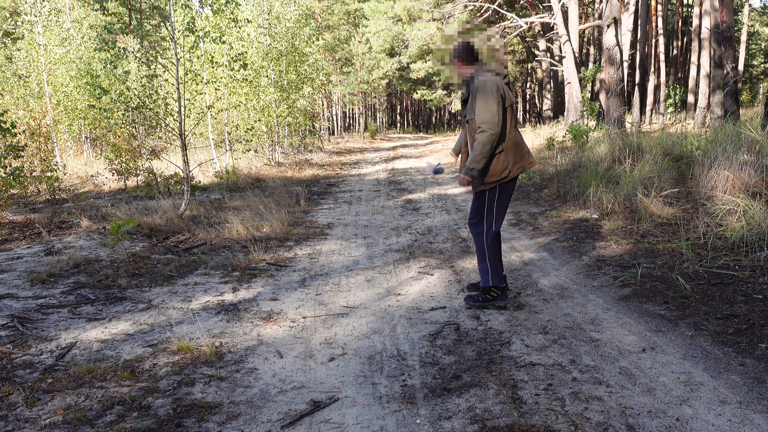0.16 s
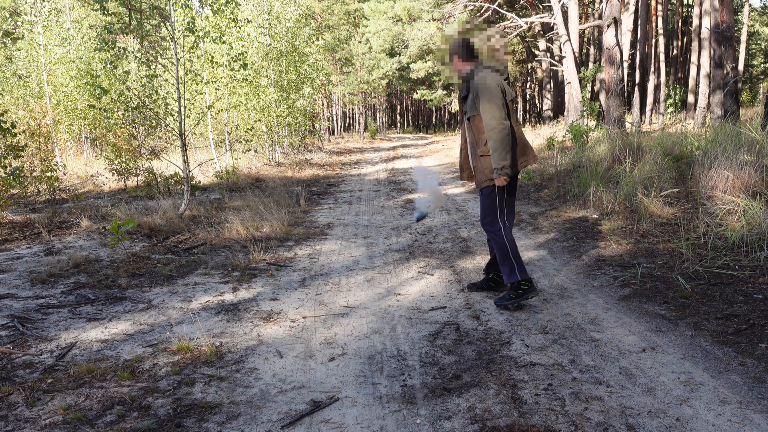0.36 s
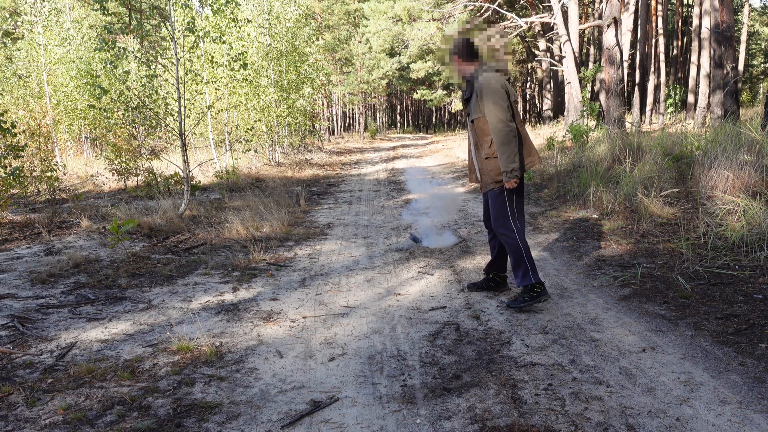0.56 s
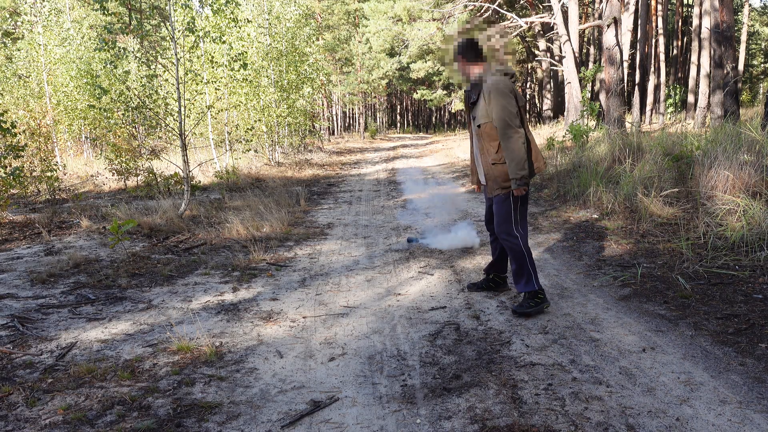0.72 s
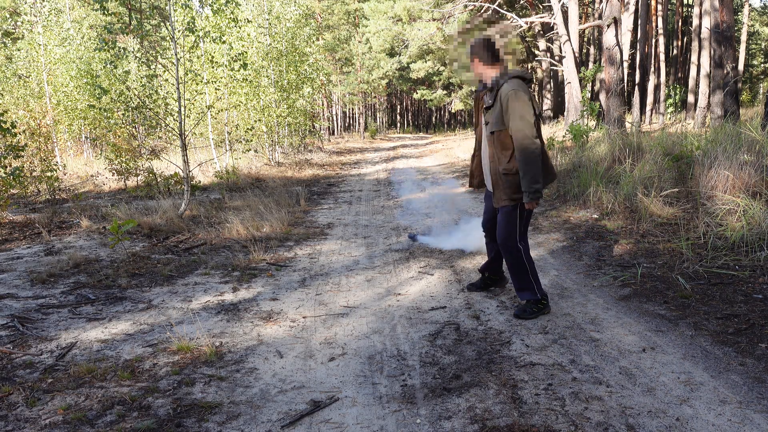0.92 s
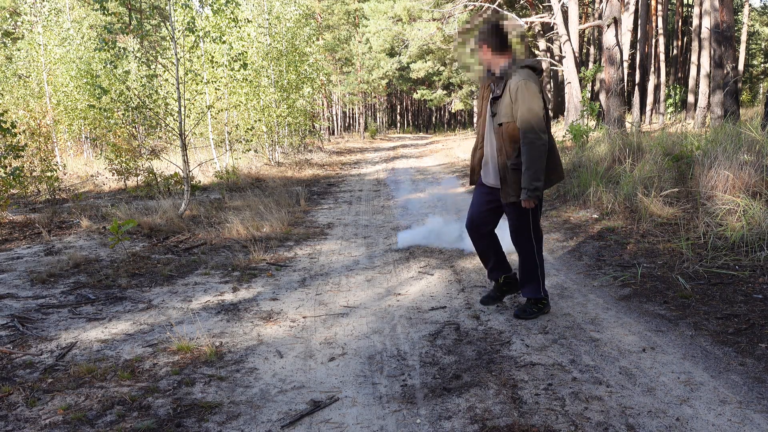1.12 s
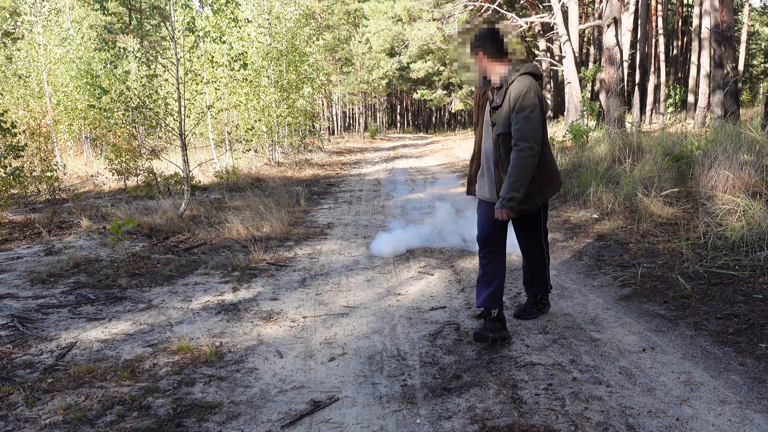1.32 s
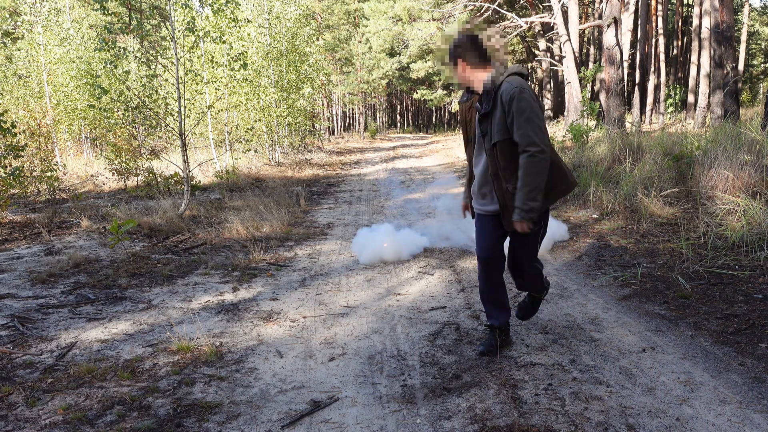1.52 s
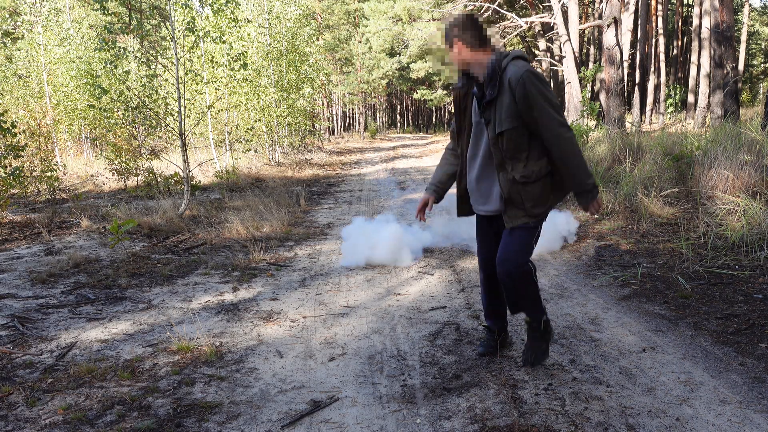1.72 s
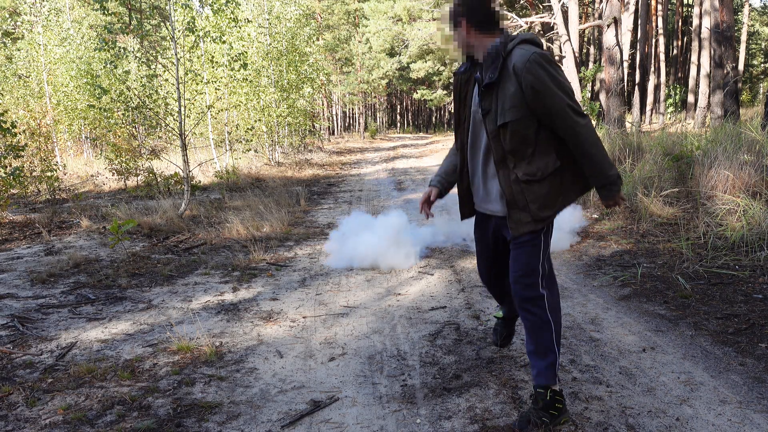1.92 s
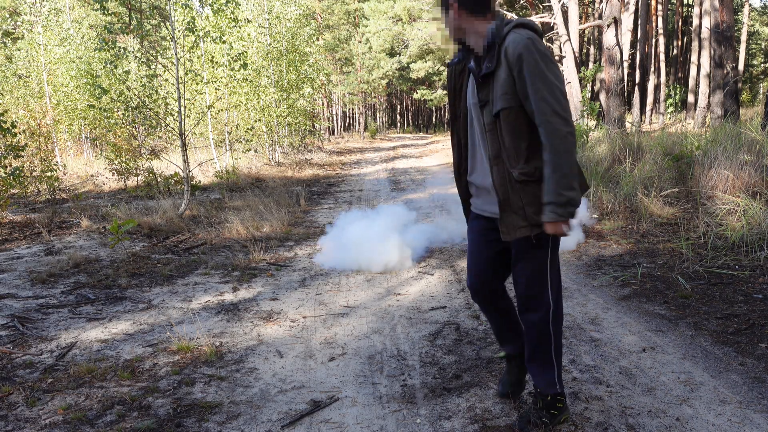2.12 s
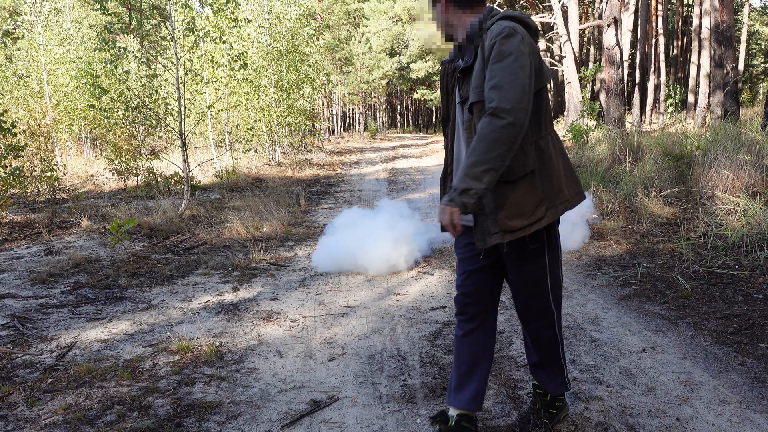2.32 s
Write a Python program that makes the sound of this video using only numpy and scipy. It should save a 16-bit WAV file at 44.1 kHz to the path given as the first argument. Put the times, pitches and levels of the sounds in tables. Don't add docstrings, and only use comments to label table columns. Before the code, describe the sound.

A smoke grenade ignites with a quick sharp pop, then a loud turbulent gas hiss bursts out, shifting between dull and bright as it rolls, with crackling and snapping spits, outdoors in quiet forest, in stereo.

```python
import sys
import numpy as np
from scipy import signal
from scipy.io import wavfile
from scipy.ndimage import map_coordinates

SR = 44100
rng = np.random.default_rng(int(sys.argv[2]) if len(sys.argv) > 2 else 0)


def to_linear_factor(level_db):
    exponent = np.asarray(level_db, float) / 20
    return 10 ** exponent


def output_pcm(signal):
    pcm = np.clip(np.atleast_2d(signal).T, -1, 1) * 32767
    wavfile.write(sys.argv[1], SR, np.round(pcm).astype(np.int16))


N = 104120


def in_time(rows):
    start_s, *columns = np.transpose(rows)
    return [np.interp(np.arange(N) / SR, start_s, column) for column in columns]


def rms_one(x):
    return x / np.sqrt(np.mean(x ** 2) + 1e-20)


def band(x, low_hz, high_hz):
    edges_hz = [low_hz, min(high_hz, .46 * SR)]
    return signal.sosfilt(signal.butter(2, edges_hz, "band", fs=SR, output="sos"), x)


def low_pass(x, cut_hz):
    return signal.sosfilt(signal.butter(1, cut_hz, fs=SR, output="sos"), x)


def drift(rate_hz):
    pole = np.exp(-40 * np.pi * rate_hz / SR)
    noise = rng.standard_normal(N // 20 + 4002)
    slow = signal.lfilter([1], [1, -2 * pole, pole * pole], noise)[4000:]
    return np.interp(np.arange(N) / 20, np.arange(len(slow)), rms_one(slow - slow.mean()))


def banded(spectrum, gain_db):
    white = rng.standard_normal((2, N))
    edges_hz = 35 * 2 ** np.arange(0, 9.1, .5)
    hz, db = np.transpose(spectrum)
    plain, out = 0, 0
    for k, (low_hz, high_hz) in enumerate(zip(edges_hz, edges_hz[1:])):
        colour_db = np.interp(np.log(low_hz * high_hz) / 2, np.log(hz), db)
        part = to_linear_factor(colour_db) * band(white[k % 2], low_hz, high_hz)
        plain = plain + part
        out = out + part * to_linear_factor(gain_db(np.sqrt(low_hz * high_hz)))
    return out / np.std(band(plain, 1000, 6000))


def bursts(rows):
    t, shape, clicks = np.arange(N) / SR, np.zeros(N), np.zeros(N)
    for start_s, peak_db, decay_s in rows:
        fade = np.exp(-np.clip(t - start_s, 0, 1) / max(decay_s, 2e-4))
        shape += to_linear_factor(peak_db) * (t >= start_s) * fade
        clicks[int(start_s * SR)] = to_linear_factor(peak_db)
    return shape, clicks


# freq_hz, density_db [dB per Hz]
FOREST_COLOUR = [(24, -60), (40, -52), (148, -5), (406, -9), (1620, -9.5), (14500, -19), (16500, -39)]


def forest_air():
    level_db = -55
    return to_linear_factor(level_db) * rms_one(banded(FOREST_COLOUR, lambda hz: 0))


# start_s, peak_db, decay_s
PRIMER_POPS = [
    (.0698, -17, .0012),
    (.0721, -9, .0008),
    (.0733, -10, .0009),
]
# centre_hz, width_hz, level_db
MOUTH_MODES = [(1240, 1130, 0), (3920, 2100, 1), (7700, 3100, -7.5), (13300, 3400, -11)]


def ignition():
    shape, clicks = bursts(PRIMER_POPS)
    kick = shape * rng.standard_normal(N) + 2 * clicks
    out = 0
    for k, (centre_hz, width_hz, level_db) in enumerate(MOUTH_MODES):
        ring = band(kick, centre_hz - width_hz / 2, centre_hz + width_hz / 2)
        out = out + (-1) ** k * to_linear_factor(level_db + 6.5) * ring
    return out


# start_s, pressure_db, aim_db [nozzle aim as treble gain], sputter [0-1], bass_db [fullness]
GAS_JET = [(.1, -18.5, -7.5, 0.5, 1.5), (.22, -13.5, -21, 0.03, 1.5), (.32, -24.5, -28.5, 0.17, 2),
           (.39, -28, -18, 0.3, 8), (.49, -25.5, -5.5, 0.25, 12), (.62, -30.5, -5, 0.45, 12),
           (.75, -28.5, 2.5, 0.6, 5), (.9, -31.5, -5, 0.62, 0.5), (1.01, -30.5, 3, .5, 2),
           (1.14, -25, -19.5, 0.74, -4), (1.22, -18, -20, 0.4, -19), (1.29, -19, -8.5, 0.73, 5),
           (1.45, -19, -17.5, 0.42, 6.5), (1.57, -25, -14.5, 0.83, -1), (1.78, -27, -4, 0.91, -5.5),
           (1.99, -26, 4, 0.52, -9), (2.19, -21, -3, 0.64, 3.5), (2.36, -20.5, -6.5, 0.38, 10.5)]
# freq_hz, density_db [dB per Hz]
JET_SPECTRUM = [(24, -68), (40, -33), (349, -19), (608, -21.5), (1360, -1.5), (2250, 1.5), (4680, 0),
                (15300, -11.5), (16500, -25)]


def jet():
    aim_from_hz, aim_full_hz, aim_mean_db = 2610, 12650, -9.5
    light_s, light_rise_s, light_start_db = .0745, .024, -13
    flutter_db, bass_flutter_db, patch_db = 2.2, 5.0, 1.3
    pressure_db, aim_db, sputter, bass_db = in_time(GAS_JET)
    flutter = np.clip(sputter, 0, 1) * (drift(31) + 1.28 * drift(165))

    def gain_db(hz):
        treble = np.clip(np.log(hz / aim_from_hz) / np.log(aim_full_hz / aim_from_hz), 0, 1.3)
        low = np.clip(np.log2(3000 / hz) / 2.84, 0, 1)
        tone_db = treble * (aim_db - aim_mean_db) + low * bass_db
        shared_db = (flutter_db + bass_flutter_db * low) * flutter
        return tone_db + shared_db + patch_db * drift(35)

    t = np.arange(N) / SR
    rise_db = light_start_db * np.clip(1 - (t - light_s) / light_rise_s, 0, 1)
    lit = (t > light_s) * to_linear_factor(rise_db)
    return lit * to_linear_factor(pressure_db) * banded(JET_SPECTRUM, gain_db)


# start_s, notch_hz [first notch], share [0-1]
SAND_ECHO = [(0, 2110, 0.94), (.42, 2170, 0.53), (.47, 1300, 0.33), (.53, 3630, 0.26), (.64, 2950, 0.22),
             (.9, 3330, 0.4), (1.2, 3000, 0.5), (1.3, 2300, 0.36), (2.36, 2100, 0.24)]


def sand_echo(x):
    cut_hz = 8000
    notch_hz, share = in_time(SAND_ECHO)
    filter_delay = SR / (2 * np.pi * cut_hz)
    late = map_coordinates(x, [np.arange(N) + filter_delay - SR / (2 * notch_hz)], order=3)
    late = low_pass(late, cut_hz)
    share = np.clip(share, 0, 1)
    return (x + share * late) / np.sqrt(1 + share ** 2)


def trees(x):
    t60_s, gap_s, cut_hz = 0.92, .004, 11000
    t = np.arange(SR // 2) / SR
    tail = rng.standard_normal(len(t)) * to_linear_factor(-60 * t / t60_s) * (t > gap_s)
    wet = signal.fftconvolve(x, tail / np.sqrt(np.sum(tail ** 2)))[:N]
    return low_pass(wet, cut_hz)


def crackle():
    rate_per_s, clump_db, level_db, spread_db = 450, 5, -3, 4.0
    low_hz, high_hz, tail_s = 700, 8000, .0004
    pressure_db, aim_db, sputter, _ = in_time(GAS_JET)
    born = rng.random(N) < rate_per_s * to_linear_factor(clump_db * drift(30)) / SR
    born = born * (np.arange(N) > GAS_JET[0][0] * SR)
    sizes = to_linear_factor(spread_db * np.minimum(rng.exponential(1, N), 3)) * born
    tails = signal.lfilter([0, 1], [1, -np.exp(-1 / (tail_s * SR))], sizes)
    ragged = sizes + .3 * tails * rng.standard_normal(N)
    colour = rng.integers(0, 3, N // 64 + 1).repeat(64)[:N]
    parts = []
    for k, top_hz in enumerate(high_hz * np.array([.5, 1, 2])):
        parts.append(band(ragged * (colour == k) + 1e-18, low_hz * 1.5 ** k, top_hz))
    dull, middle, bright = parts
    spikes = dull + middle + bright * to_linear_factor(.7 * aim_db)
    return to_linear_factor(pressure_db + level_db) * np.clip(sputter, 0, 1) * rms_one(spikes)


# start_s, peak_db, decay_s
SLAG_SPITS = [(0.516, -7, 0.004), (0.711, -9, 0.0032), (0.749, -8, 0.004), (0.765, -11.5, 0.0025),
              (0.816, -11, 0.0022), (0.867, -9, 0.0051), (0.946, -8, 0.0025), (1.006, -12, 0.0035),
              (1.026, -11.5, 0.0028), (1.081, -6, 0.0049), (1.167, -16, 0.0033), (1.211, -15, 0.0031),
              (1.218, -15, 0.004), (1.248, -16, 0.0035), (1.482, -9, 0.004), (1.512, -3, 0.004),
              (1.531, -7.5, 0.0033), (1.541, -6.5, 0.0029), (1.594, -3.5, 0.0048), (1.617, -2.5, 0.0037),
              (1.627, -7, 0.0033), (1.651, -3, 0.0051), (1.721, -6, 0.0061), (1.744, -17, 0.0032),
              (1.828, -2, 0.005), (1.842, -1.5, 0.0046), (1.94, -11, 0.0029), (1.961, -3.5, 0.0024),
              (2.021, -3, 0.0034), (2.124, -1, 0.004)]


def spits():
    puff_db, snap_db = -13, 7
    shape, clicks = bursts(SLAG_SPITS)
    puff = shape * rms_one(band(rng.standard_normal(N), 500, 7000))
    snap = band(clicks, 1300, 6400)
    return to_linear_factor(puff_db) * puff + to_linear_factor(snap_db) * snap


def scene():
    trees_db, side_air_db = -18, -9.5
    flare_width_db, flare_s, flare_fade_s = -13, 0.085, 0.83
    settled_width_db, settled_cut_hz = -17, 650
    t = np.arange(N) / SR
    source = sand_echo(jet() + crackle() + spits()) + ignition()
    wide = trees(source)
    flare = to_linear_factor(flare_width_db) * np.exp(-np.clip(t - flare_s, 0, 9) / flare_fade_s)
    side = flare * wide + to_linear_factor(settled_width_db) * band(wide, 40, settled_cut_hz)
    mid = source + to_linear_factor(trees_db) * trees(source) + forest_air()
    side = side + to_linear_factor(side_air_db) * forest_air()
    return np.array([mid + side, mid - side])


def roll_off(x):
    return signal.sosfilt(signal.butter(12, 16860, fs=SR, output="sos"), x)


def record(dry):
    mic_cut_hz = 120
    x = signal.sosfilt(signal.butter(4, mic_cut_hz, "high", fs=SR, output="sos"), dry)
    mix = 1.2 * np.tanh(x / 1.193)
    return roll_off(mix)


dry = scene()
out = record(dry)
output_pcm(out)
```